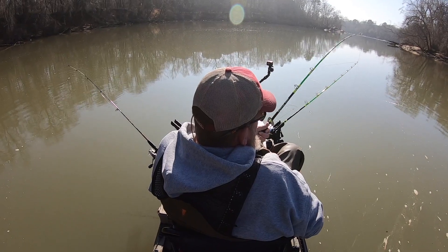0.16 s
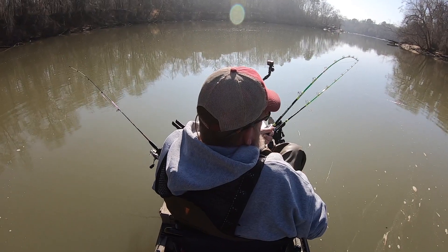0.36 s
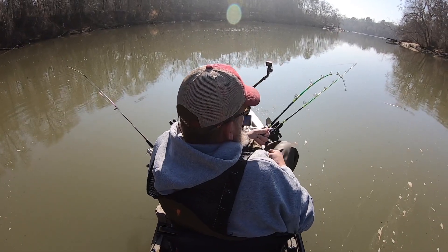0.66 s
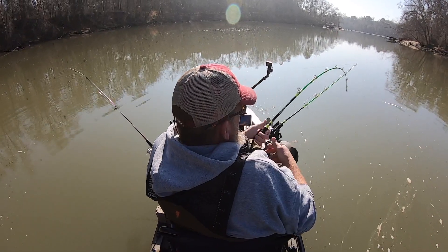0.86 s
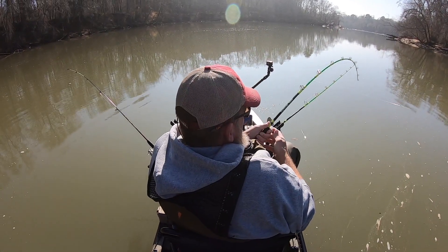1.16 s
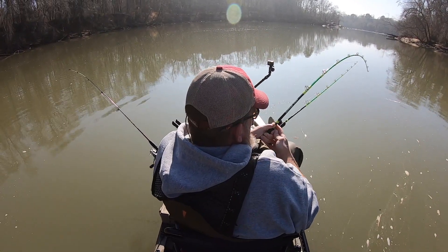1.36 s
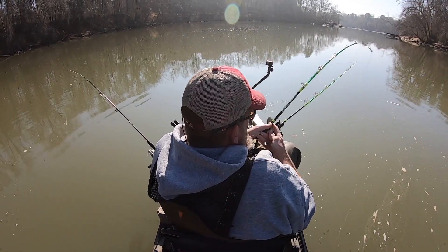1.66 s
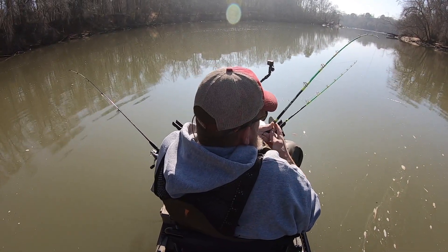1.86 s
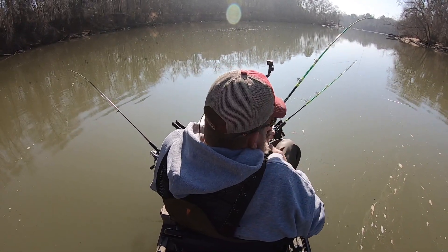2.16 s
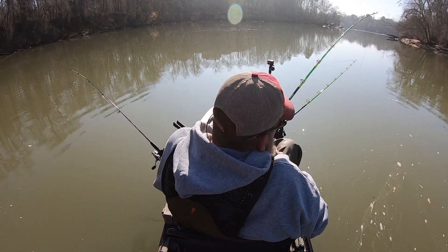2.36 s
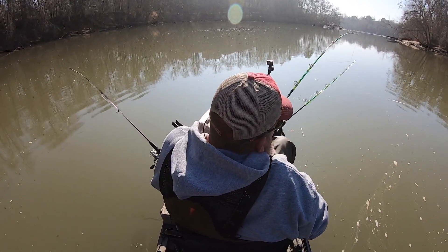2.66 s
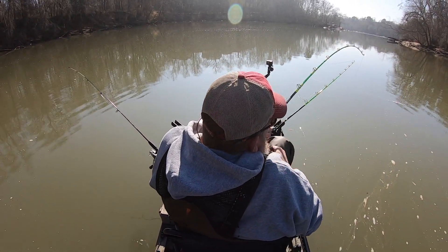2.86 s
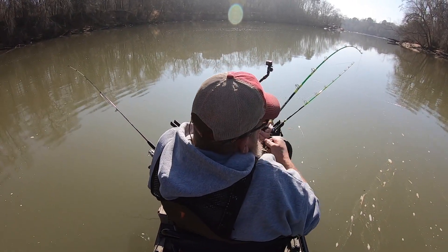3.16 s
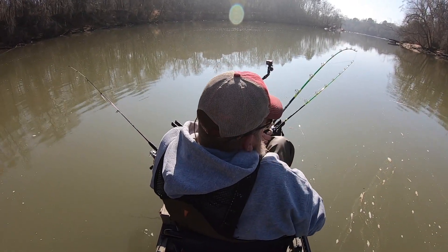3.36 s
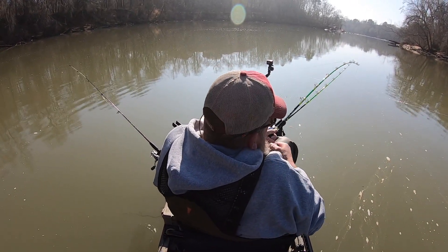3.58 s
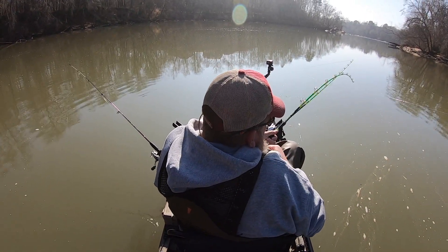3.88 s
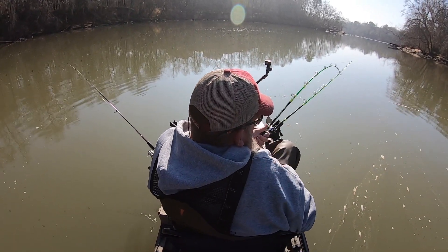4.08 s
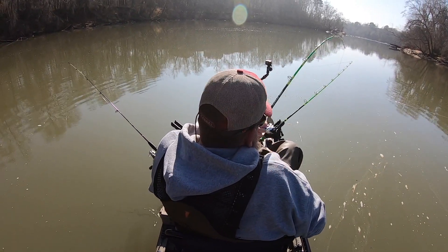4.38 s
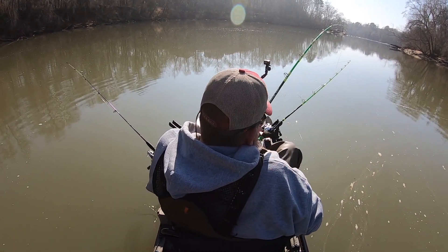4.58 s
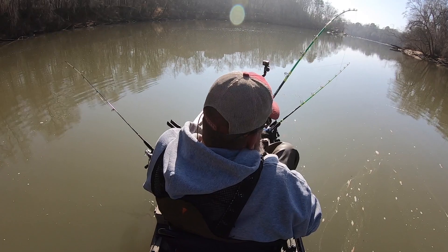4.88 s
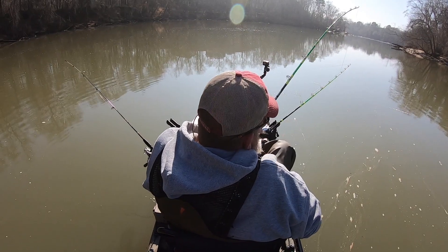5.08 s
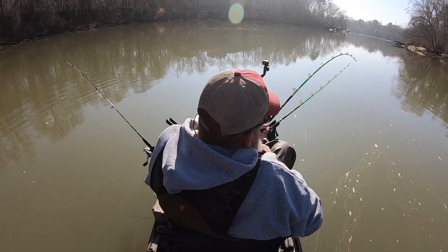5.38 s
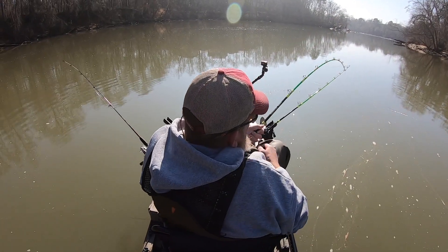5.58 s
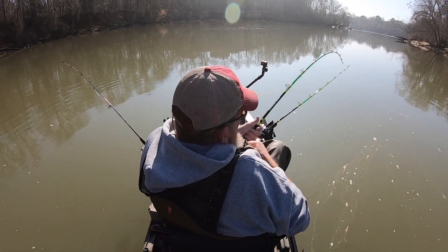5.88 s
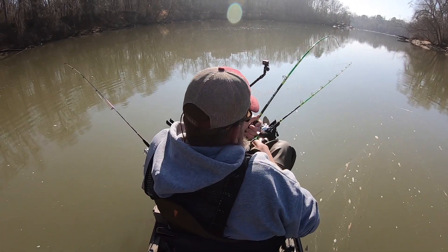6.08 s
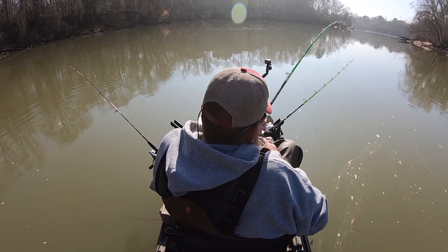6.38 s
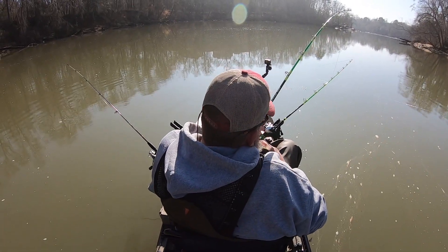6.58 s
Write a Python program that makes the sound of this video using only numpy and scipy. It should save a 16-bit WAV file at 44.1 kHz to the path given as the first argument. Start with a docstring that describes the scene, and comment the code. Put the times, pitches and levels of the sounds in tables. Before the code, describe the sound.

Close on a kayak on a calm river, a reel's drag ratchets in bright metallic spurts: two early, a nearly silent gap, then a longer run and several bursts in the middle, and a quick one near the end. Dull hull knocks, gear ticks and cloth rustle fall between them over a low rumble. Wind buffets late. Dry, outdoor, almost mono camera sound.

```python
"""On a kayak, a fishing reel's drag slips in spurts as a fish pulls line.
A spring pawl snaps over the spool's teeth: each snap is a cluster of blows ringing the spool and frame.
Filtered noise makes washer hiss, rustling cloth, a low rumble, rising wind and a thin airy swish.
Gear knocks and ticks on the hull as ringing puffs, two drips are damped tones, and a faint creak is
a string of small slips. A camera hears it all almost in mono."""
import sys
import numpy as np
from scipy import signal
from scipy.fft import rfft, irfft, next_fast_len
from scipy.io import wavfile
from scipy.ndimage import uniform_filter1d, map_coordinates

SR = 44100
rng = np.random.default_rng(int(sys.argv[2]) if len(sys.argv) > 2 else 0)


def wav_out(sig):
    """Save sig, one row per channel (or a flat mono array), as 16-bit PCM at SR to the path in sys.argv[1]."""
    wavfile.write(sys.argv[1], SR, np.round(np.clip(np.atleast_2d(sig).T, -1, 1) * 32767).astype(np.int16))


N = 297234

# Resonances of the reel's spool: centre_hz, width_hz, relative_level_db
SPOOL_MODES = [(6260, 510, -7.5), (7350, 395, -3), (7850, 143, 2.5), (8450, 590, 2.5), (10275, 650, 3.5),
               (11570, 1170, -3), (13500, 830, -0.5), (15560, 820, -0.5)]
# Resonances of the reel's frame: centre_hz, width_hz, relative_level_db
FRAME_MODES = [(1090, 400, 1), (1590, 260, -2.5), (2227, 540, 2.5), (2796, 330, 2.5), (3257, 420, 7.5),
               (3900, 1930, 4.5), (5700, 450, 3)]


def amp(db):
    """Turn decibels into a gain."""
    return 10 ** (np.asarray(db) / 20)


def unit(x):
    """Scale each row to an rms of 1."""
    return x / np.sqrt(np.mean(x ** 2, axis=-1, keepdims=True) + 1e-20)


def along(points, hz):
    """Read a curve of (Hz, value) points, joined by straight lines on a log frequency axis."""
    point_hz, value = np.transpose(points)
    return np.interp(np.log(hz + 1), np.log(point_hz + 1), value)


def curves(rows):
    """Give one value per sample for each column after the time."""
    s, *columns = np.transpose(rows)
    return [np.interp(np.arange(N) / SR, s, column) for column in columns]


def wobble(rate):
    """Draw a smooth random curve through `rate` random points a second."""
    points = rng.standard_normal(int(N * rate / SR) + 4)
    return map_coordinates(points, [np.arange(N) * rate / SR])


def filtered(x, response):
    """Filter x by multiplying its spectrum by a response that depends on frequency."""
    n = x.shape[-1]
    size = next_fast_len(n + 8192)  # spare room for the ringing
    hz = np.fft.rfftfreq(size, 1 / SR)
    return irfft(rfft(x, size) * response(hz), size)[..., :n]


def noise(spectrum):
    """Shape random noise with a spectrum curve and scale it to an rms of 1."""
    return unit(filtered(rng.standard_normal(N), lambda hz: amp(along(spectrum, hz))))


def resonance(f, hz, width_hz):
    """One resonance that rings after a blow, with gain 1 at its centre."""
    return 1j * f * width_hz / (hz * hz - f * f + 1j * f * width_hz)


def body(f, modes):
    """One row of response for each resonance of an object, with alternating signs."""
    rows = []
    for k, (hz, width_hz, db) in enumerate(modes):
        rows.append((-1) ** k * amp(db) * resonance(f, hz, width_hz))
    return np.array(rows)


def placed(seconds, bursts):
    """Add up rows of short sounds, each at its own time."""
    start = np.round(np.asarray(seconds) * SR).astype(int)
    at = start[:, None] + np.arange(bursts.shape[1])
    return np.bincount(at.ravel(), bursts.ravel(), N + SR)[:N]


def puffs(count, rise, t60, size=2048):
    """Rows of noise with a soft rise (s) and a fade that falls 60 dB in t60 (s)."""
    t = np.arange(size) / SR
    shape = (1 - np.exp(-t / rise)) * amp(-60 * t / t60)
    return shape * rng.standard_normal((count, size))


def drifting(rows, memory):
    return signal.lfilter([np.sqrt(1 - memory ** 2)], [1, -memory], rows, axis=0)


def rumble():
    """A steady low rumble of river and hull; late wind gusts buffet the microphone."""
    # Spectrum of river and hull: pitch_hz, relative_level_db
    low_spectrum = [(8.2, -7), (14, 0.5), (85, -6), (186, -14.5), (216, -17), (393, -26.5), (1200, -49.5),
                    (1560, -89), (2640, -120)]
    # Spectrum of the wind at the microphone: pitch_hz, relative_level_db
    wind_spectrum = [(2, -8), (8, 0), (25, -14), (60, -26), (170, -45), (500, -120)]
    # Strength of the wind: time_s, level_db
    gusts = [(4.3, -50), (4.75, -35), (5.1, -27), (5.3, -26), (5.65, -20), (5.9, -26), (6.15, -24),
             (6.4, -26), (6.57, -21), (6.74, -22)]
    gust_db, = curves(gusts)
    return amp(-43) * noise(low_spectrum) + amp(gust_db) * noise(wind_spectrum)


def rustle():
    """Cloth and gear rub: a fine hiss and a grainier, coloured scuff that swell with movement."""
    # Loudness of the hiss as things move: time_s, level_db
    movement = [(0, -66.5), (.64, -61.5), (.81, -58), (1.04, -68.5), (1.21, -63.5), (1.46, -70.5),
                (1.74, -68), (2.02, -65), (2.31, -67), (3.02, -60), (4.09, -59.5), (4.54, -64),
                (4.76, -69.5), (4.96, -60.5), (5.62, -59), (5.77, -52), (5.86, -63), (6.41, -67.5)]
    # Spectrum of the fine hiss: pitch_hz, relative_level_db
    hiss_spectrum = [(950, -20), (3600, -4.5), (5900, -4.5), (8100, -2.5), (11600, -2.5), (15500, -9.5)]
    # Resonances that colour the scuff: centre_hz, width_hz, relative_level_db
    scuff_modes = [(620, 500, -1), (1420, 270, -1), (2140, 790, -5.5)]
    hiss_db, = curves(movement)
    mean_db = hiss_db.mean()
    scuff_db = mean_db - 0.5 + 1.12 * (hiss_db - mean_db)  # swings wider than the hiss

    grain = wobble(70)  # shared fine flicker
    hiss = unit(amp(1.2 * grain + .8 * wobble(12)) * noise(hiss_spectrum))
    rub = amp(2.5 * grain + 1.5 * wobble(18)) * rng.standard_normal(N)
    scuff = unit(filtered(rub, lambda f: body(f, scuff_modes).sum(axis=0)))
    return amp(hiss_db) * hiss + amp(scuff_db) * scuff


def knocks():
    """A soft blow and a puff of contact noise ring the hull modes nearest the blow's brightness."""
    # Dull blows on the hull: start_s, peak_db, brightest_hz
    hull_blows = [(.066, -42, 800), (0.62, -40.5, 655), (0.726, -34.5, 393), (1.022, -44, 500),
                  (1.228, -34, 900), (2.801, -40, 570), (3.475, -34.5, 606), (3.7, -32, 655),
                  (4.424, -29.5, 646), (5.368, -30, 1020), (5.691, -22.5, 400), (6.188, -43.5, 636),
                  (6.46, -39.5, 573), (6.68, -38.5, 600)]
    # Resonances of the hull: centre_hz, width_hz, relative_level_db
    hull_modes = [(345, 260, -0.5), (597, 190, 0.5), (1070, 580, -2.5), (1300, 810, -13.5)]
    # Faint taps of gear on the hull at random times, 6 a second on average
    draw = rng.random((int(6 * N / SR), 3))
    taps = np.transpose([draw[:, 0] * N / SR, -56 + 7 * draw[:, 1], 400 + 800 * draw[:, 2]])
    s, peak_db, brightest_hz = np.vstack([hull_blows, taps]).T

    blows = amp(-17) * puffs(count=len(s), rise=0.00011, t60=0.036)
    blows[:, 44] += 1  # the blow itself, 1 ms in
    octaves_away = np.log2(np.transpose(hull_modes)[0] / brightest_hz[:, None])
    scatter_db = 2 * rng.standard_normal((len(s), len(hull_modes)))
    strength = amp(-3 * octaves_away ** 2 + scatter_db)
    soft = lambda f: 1 / (1 - (f / 1450) ** 2 + 1.1j * f / 1450) ** 2  # a soft contact has little treble
    rung = filtered(blows, lambda f: strength @ body(f, hull_modes) * soft(f))
    return placed(s, amp(peak_db)[:, None] * rung / np.abs(rung).max(axis=1, keepdims=True))


def ticks():
    """Small hard contacts: short puffs ring about a centre frequency, with some broad spill."""
    # Contacts: start_s, peak_db, centre_hz
    contacts = [(0.1725, -41.5, 7420), (0.768, -30.5, 2120), (0.8122, -35, 1970), (2.385, -38, 7800),
                (2.981, -27.5, 5200), (3.0645, -35.5, 2120), (3.16, -45, 9400), (4.137, -38, 2010),
                (4.449, -44, 1850), (4.6082, -39, 2190), (4.697, -44, 1960), (4.8384, -44.5, 2070),
                (5.432, -41, 2120), (5.457, -33, 5300), (5.7323, -20.5, 5430), (5.841, -42, 5000),
                (5.8848, -40, 2100)]
    s, peak_db, hz = np.transpose(contacts)
    centre_hz = hz[:, None]
    broad = lambda f: amp(-21) * resonance(f, centre_hz, 5 * centre_hz)
    colour = lambda f: resonance(f, centre_hz, 480) + broad(f)
    bursts = filtered(puffs(count=len(s), rise=.0008, t60=.02), colour)
    return placed(s, amp(peak_db)[:, None] * bursts / np.abs(bursts).max(axis=1, keepdims=True))


def teeth():
    """Time and level of every snap: the pawl drops each time the spool has passed a whole tooth."""
    # Single teeth as the spool creeps: start_s, relative_level_db
    single_snaps = [(0.2166, -17), (0.736, -37), (0.7565, -27), (.798, -23.5), (0.852, -28), (.8926, -29),
                    (0.9394, -25.5), (1.0756, -27.5), (2.8546, -16.5), (2.886, -16), (2.9082, -20.5),
                    (2.9365, -17), (2.9955, -29), (3.1029, -16.5), (3.3525, -18), (4.3053, -27),
                    (5.1085, -18.5), (5.139, -21), (5.2449, -16.5), (5.3415, -16), (5.3696, -15),
                    (5.398, -21), (5.6507, -19), (5.7, -19.5), (5.758, -20.5), (5.7821, -21), (5.8042, -30)]
    # One curve of spool speed for each spurt: time_s, teeth_per_s
    spurts = [
        [(0.246, 43.7), (0.346, 77.0), (0.451, 52.6), (0.4758, 40.6)],
        [(0.5262, 26.8), (0.566, 78.4), (0.5896, 83.2)],
        [(2.4222, 51.8), (2.492, 76.1), (2.532, 45.7), (2.622, 92.9), (2.717, 60.6), (2.777, 95.7),
         (2.8185, 43.4)],
        [(3.2014, 14.5), (3.231, 71.6), (3.2838, 69.8)],
        [(3.4027, 90.0), (3.478, 107.5), (3.563, 71.9), (3.653, 104.2), (3.743, 82.4), (3.768, 49.0),
         (3.788, 86.0), (3.848, 69.0), (3.8893, 26.3)],
        [(3.9283, 33.7), (3.963, 98.2), (4.0172, 38.3)],
        [(5.481, 46.4), (5.526, 120.2), (5.5732, 17.5)],
    ]
    # Middle snap level of each spurt: relative_level_db
    spurt_db = [-17.5, -17, -16.5, -17.5, -16, -17.5, -19.5]
    rows = [np.array(single_snaps)]
    for spurt, db in zip(spurts, spurt_db):
        s, speed = np.transpose(spurt)
        t = np.arange(s[0], s[-1], 1 / SR)
        passed = np.cumsum(np.interp(t, s, speed)) / SR  # teeth so far
        at = np.interp(np.arange(round(passed[-1]) + 1), passed, t)
        doublings = np.log2(np.interp(at, s, speed) / speed.mean())
        scatter_db = 1.8 * rng.standard_normal(len(at))  # no two teeth snap alike
        rows.append(np.transpose([at, db + 2 * doublings + scatter_db]))  # 2 dB louder at twice the speed
    rows = np.vstack(rows)
    return rows[np.argsort(rows[:, 0])].T


def arrivals(count, jitter, scatter_db, size=2048):
    """One sharp blow a row, arriving by several paths whose delays vary by jitter (s)."""
    # Ways from pawl to microphone: delay_s, relative_level_db
    paths = [(0, -0.5), (.00045, 3), (.00105, 0), (.0032, -23)]
    delay, db = np.transpose(paths)
    delay = np.abs(delay + jitter * rng.standard_normal((count, len(paths))))
    gain = amp(db + scatter_db * rng.standard_normal(delay.shape))
    hz = np.fft.rfftfreq(size, 1 / SR)
    delayed = np.exp(-2j * np.pi * hz * delay[..., None])
    return irfft(np.sum(gain[..., None] * delayed, axis=1), size)


def ringing(blows, modes, colour_db):
    """Every blow shakes the modes at its own strengths; rms 1 over the first 3 ms."""
    rung = filtered(blows, lambda f: amp(colour_db) @ body(f, modes))
    return rung / np.sqrt(np.mean(rung[:, :132] ** 2, axis=1, keepdims=True))


def drag(s, spool_db):
    """The pawl lands, chatters for a few ms and rattles on; spool and reel frame colour it."""
    # Changing tone of the snaps, from spurt to spurt: time_s, spool_tilt_db_per_octave, frame_change_db
    snap_tone = [(.3, -2.5, 3), (.9, -13.5, 3), (2.45, -7, 1), (2.7, -7.5, 1), (3.2, -8, 3.5),
                 (3.7, -3.5, 2.5), (5.4, -5.5, 4.5)]
    tilt, frame_change_db = (curve[(s * SR).astype(int)] for curve in curves(snap_tone))
    # a hard snap brightens: the frame grows less than the spool
    frame_db = -31.5 + 0.47 * spool_db + frame_change_db

    chatter = amp(-6) * puffs(count=len(s), rise=0.0019, t60=0.015)
    rattle = amp(-27) * puffs(count=len(s), rise=0.00083, t60=0.058)  # weaker bounces and near echoes
    landing = arrivals(count=len(s), jitter=.00003, scatter_db=1.5)
    blows = landing + drifting(chatter + rattle, memory=.9)

    scatter = lambda modes: 2.7 * drifting(rng.standard_normal((len(s), len(modes))), memory=.3)
    octaves = np.log2(np.transpose(SPOOL_MODES)[0] / 9000)  # the tilt pivots at 9000 Hz
    spool_colour_db = scatter(SPOOL_MODES) + tilt[:, None] * octaves
    spool = amp(spool_db - 9)[:, None] * ringing(blows, SPOOL_MODES, spool_colour_db)
    frame = amp(frame_db)[:, None] * ringing(blows + 1.32 * rattle, FRAME_MODES, scatter(FRAME_MODES))
    return placed(s, spool + frame)


def washers(s, spool_db):
    """The drag washers hiss through the reel, louder where snaps come faster and harder."""
    passing = placed(s, amp(spool_db)[:, None])
    speed = np.abs(uniform_filter1d(uniform_filter1d(passing, 900), 900))  # two 20 ms averages
    spool = lambda f: body(f, SPOOL_MODES).sum(axis=0)
    frame = lambda f: amp(-4.5) * body(f, FRAME_MODES).sum(axis=0)
    hiss = unit(filtered(rng.standard_normal(N), lambda f: spool(f) + frame(f)))
    return amp(-36.5) * (speed / speed.max()) ** 3.3 * hiss


def creak():
    """A faint stick-slip creak: uneven slips about 110 a second into a soft resonance."""
    s = 1.13 + np.cumsum(rng.uniform(.006, .012, size=22))
    swell = np.hanning(len(s) + 2)[1:-1, None] ** .5
    slips = puffs(count=len(s), rise=.0006, t60=.016)
    slips = filtered(slips, lambda f: resonance(f, 1550, 1300) ** 2)
    level = amp(-69.5 + 4.3 * rng.standard_normal((len(s), 1)))
    return placed(s, swell * level * unit(slips[:, :512]))


def swish():
    """A thin airy band of noise swells and flutters, perhaps line running through the rod guides."""
    # Swells, before the flutter: middle_s, half_length_s, level_db
    swells = [(1.978, .1, -73), (4.523, 0.19, -69.5), (5.032, 0.11, -65)]
    t = np.arange(N) / SR
    swell = sum(amp(db) * np.exp(-((t - s) / half) ** 2) for s, half, db in swells)
    air = filtered(rng.standard_normal(N), lambda f: resonance(f, 5000, 720) ** 2)
    return swell * amp(2.7 * wobble(25)) * unit(air)


def drips():
    """Small bubbles: a damped tone that rises a little."""
    # Bubbles: start_s, level_db before the fade, starting_pitch_hz
    bubbles = [(3.2968, -34, 1390), (3.755, -28.5, 1410)]
    s, db, hz = np.transpose(bubbles)
    t = np.arange(2048) / SR
    tone = np.sin(2 * np.pi * hz[:, None] * t * (1 + 3.6 * t))
    fade = amp(-60 * t / 0.027) * (1 - np.exp(-t / 0.00029))
    return placed(s, amp(db)[:, None] * tone * fade)


def scene():
    """One nearly central sound; a faint, flickering scrambled copy differs from left to right."""
    # Strength of the scrambled copy, before its flicker: pitch_hz, side_minus_mid_db
    side_spectrum = [(40, -45), (400, -29), (15000, -27)]
    snaps = teeth()
    mid = rumble() + rustle() + knocks() + ticks() + drag(*snaps) + washers(*snaps)
    mid = mid + creak() + swish() + drips()

    scatter = puffs(count=1, rise=.0001, t60=0.0014, size=256)[0]
    scrambled = np.convolve(mid, scatter / np.linalg.norm(scatter))[:N]
    side = filtered(scrambled, lambda hz: amp(along(side_spectrum, hz)))
    side = side * amp(5 * wobble(12) - 4)  # flicker in dB
    return np.array([mid + side, mid - side])


def record(dry):
    """The camera's treble drops 20.5 dB at 15800 Hz and nothing passes from 17000 Hz up."""
    return filtered(dry, lambda hz: np.where(hz < 15800, 1, amp(-20.5)) * (hz < 17000))


dry = scene()
out = record(dry)
wav_out(out)
```